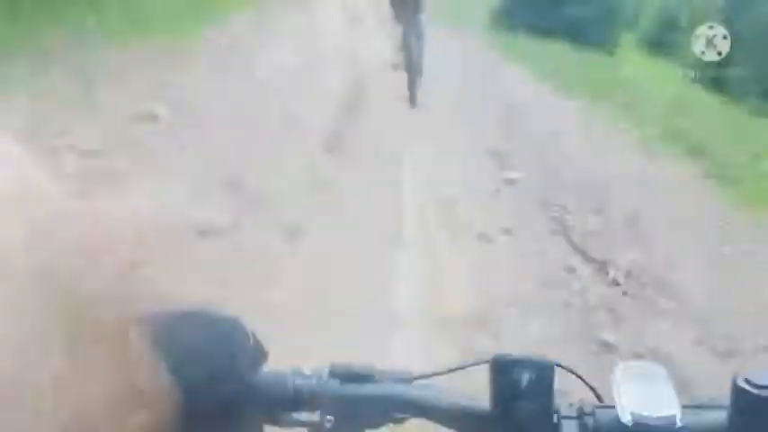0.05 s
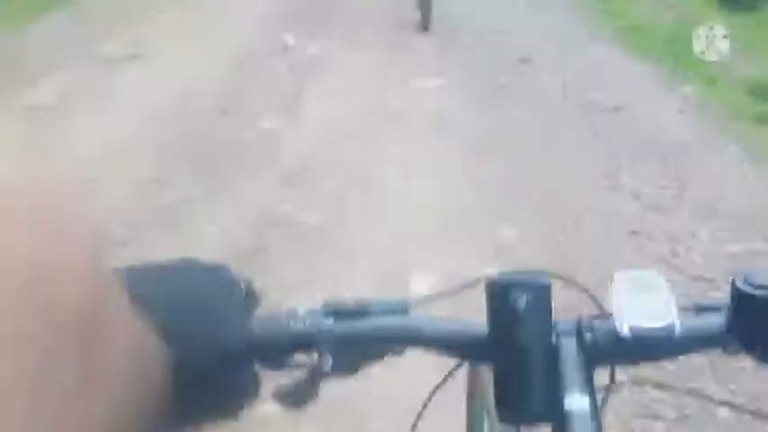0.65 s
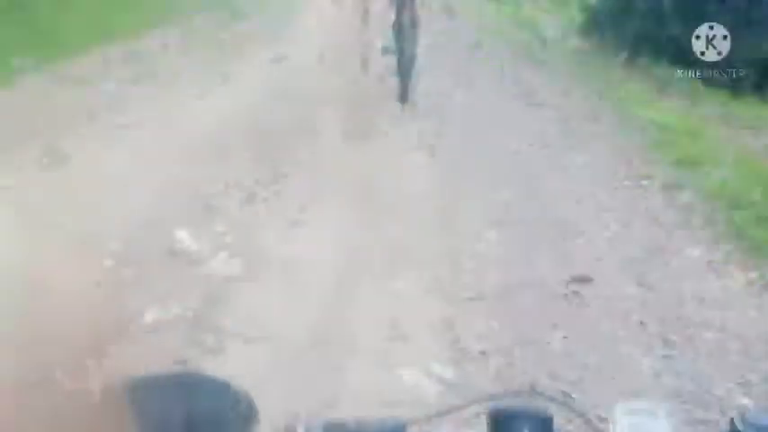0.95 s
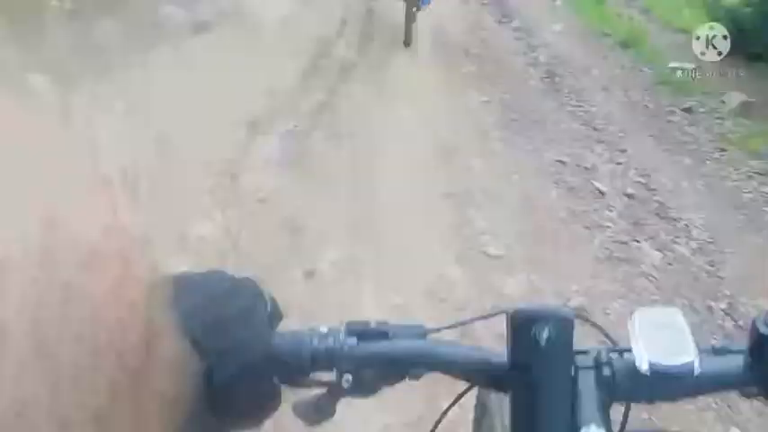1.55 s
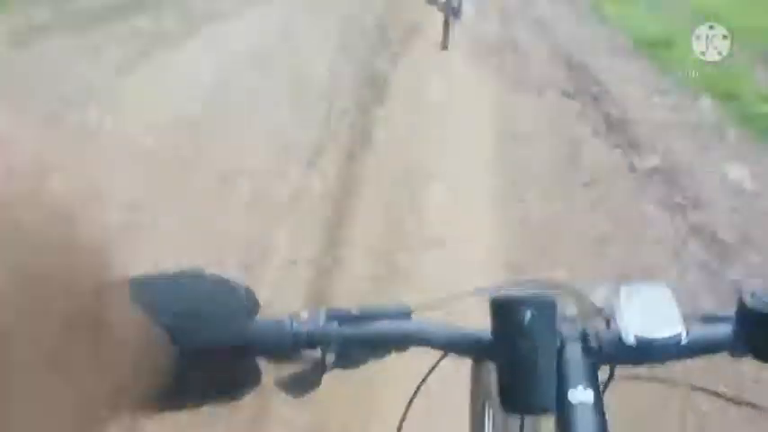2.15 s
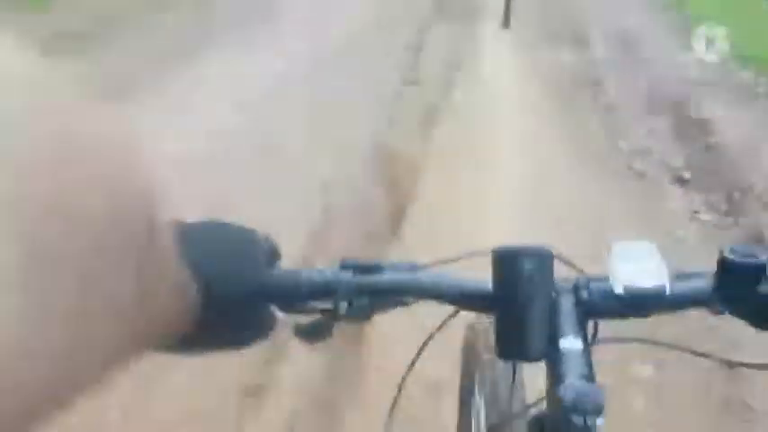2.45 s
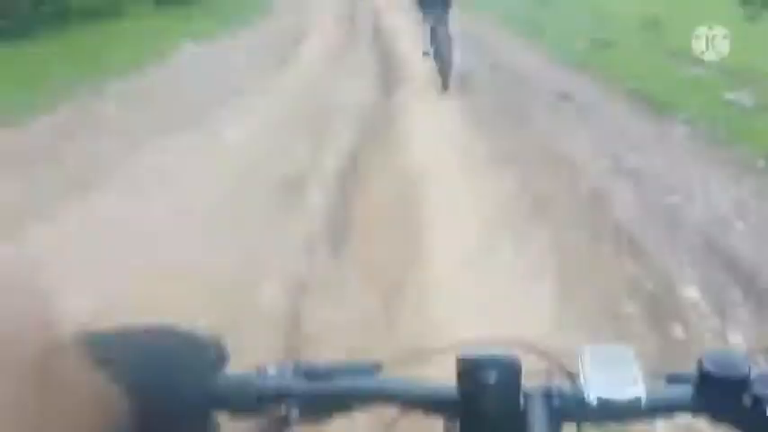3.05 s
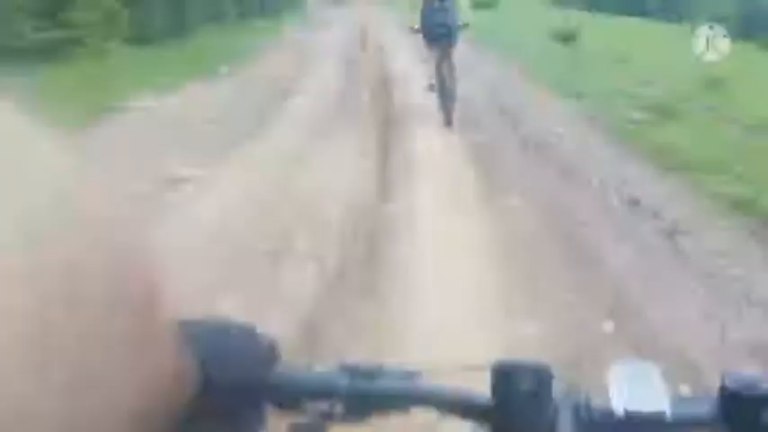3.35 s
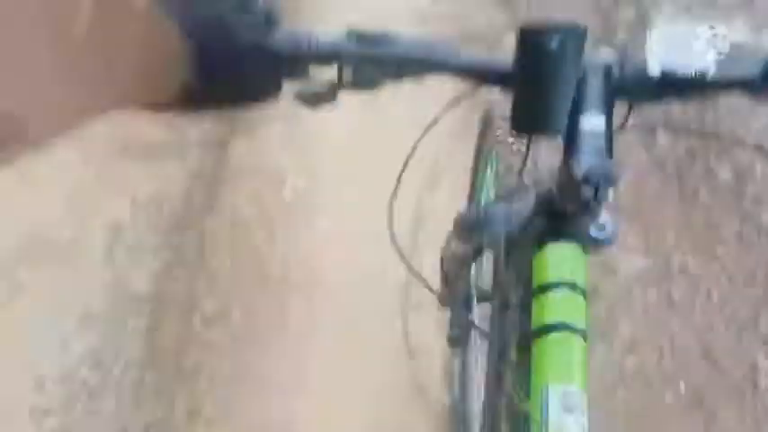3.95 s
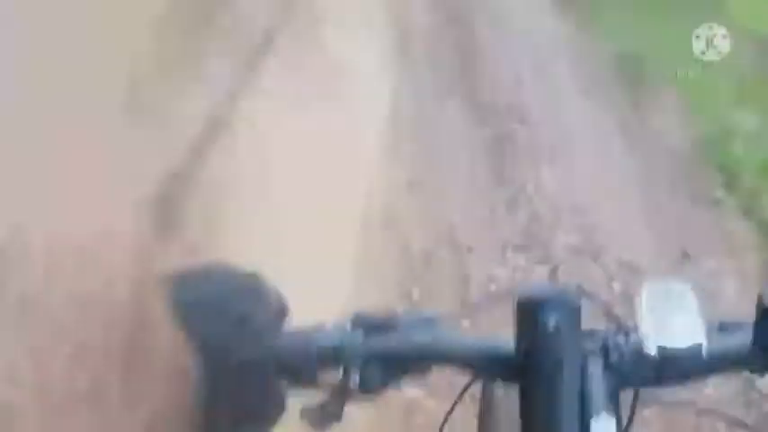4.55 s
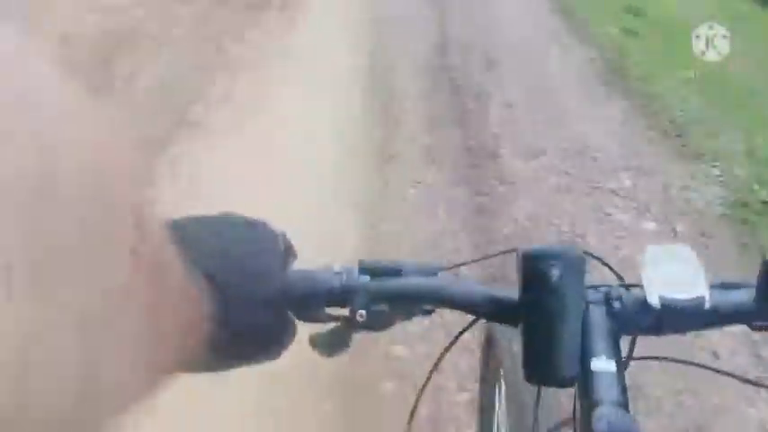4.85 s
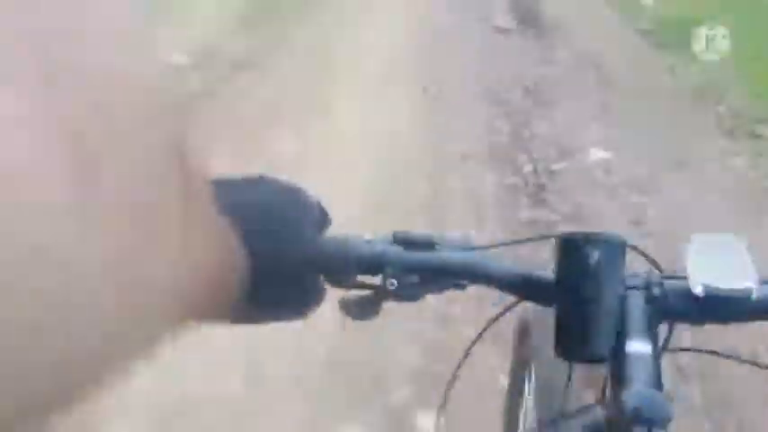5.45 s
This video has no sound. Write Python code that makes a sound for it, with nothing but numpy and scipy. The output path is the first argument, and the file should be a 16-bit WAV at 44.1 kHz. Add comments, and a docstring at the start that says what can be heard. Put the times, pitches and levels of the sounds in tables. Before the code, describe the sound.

A mountain bike runs fast along a gravel track, heard from a microphone on the rider's chest. Wind rumbles throughout as the tyres crunch grit and knock small stones. Early on, the brakes give a string of rough, wavering squeals. Stronger gusts then buffet and hiss, while bumps bring dull thuds and sharp pops. Two shorter squeals follow, and the wind and crunching carry on.

```python
"""A gust and a crunch of gravel: a mountain bike runs fast down a track, heard from the rider's chest.
Stick-slip friction makes the brakes squeal roughly with each squeeze of the lever. The tyres snap
grit and fling stones, each impact a short pulse. Turbulence buffets the two microphone ports and
hisses across the left one; hard bumps jolt the mount and bring sharp pops at the ports."""
import sys
import numpy as np
from scipy import signal
from scipy.io import wavfile
from scipy.ndimage import uniform_filter1d

SR = 44100
rng = np.random.default_rng(int(sys.argv[2]) if len(sys.argv) > 2 else 0)


def bounce(signal):
    """Save signal as a 16-bit WAV file at the path given by the first command-line argument."""
    frames = np.transpose(np.atleast_2d(signal))
    limited = np.clip(frames, -1, 1)
    pcm = np.round(limited * 32767).astype(np.int16)
    wavfile.write(sys.argv[1], SR, pcm)


N = 250929
TIME = np.arange(N) / SR

# lever squeezes: t/s of full grip, hold/s, 20 dB rise/s, 20 dB fall/s, level/dB, overtones/dB, f/Hz
SQUEEZES = [(.74, .06, 0.04682, .25, -23.5, -9, 828), (0.996, 0.19877, 0.3812, 0.3817, -19, 1, 828.5),
            (1.25, 0.23742, 0.0953, 0.0757, -20.5, 0, 844.8),
            (1.573, 0.06753, 0.2238, 0.1412, -21, -0.5, 837.1),
            (1.678, 0.029956, 0.0404, 0.0401, -18, 4, 845.9),
            (1.798, 0.07872, 0.2575, 0.1701, -21.5, 1.5, 834.2),
            (2.146, 0.08213, 0.179, 0.1765, -20, 0, 828.2),
            (3.151, 0.03213, 0.0216, 0.0625, -19.5, 4, 840.5), (3.175, .045, .16, .21, -18, -12.5, 822),
            (4.362, 0.02202, 0.2207, 0.1617, -29.5, -12.5, 823),
            (4.414, 0.01075, 0.0684, 0.1332, -22, 0.5, 853.3),
            (4.459, 0.078126, 0.0969, 0.3409, -19.5, -0.5, 839.4),
            (4.83, 0.03455, 0.0023, 0.2456, -32, 1.5, 836.8)]
# squeal at a firm grip: harmonic number, left level/dB, right level/dB, port likeness, echo share
SQUEAL_PARTIALS = [(1, -18.5, -25, 0.21, 0.54), (2, -20.5, -25, 0.8, 0.64), (3, -37, -50, 0, .55),
                   (4, -38.5, -59, .82, 0.58)]
FIRM_GRIP_DB, CATCH_DB = -20, -16   # the squeal dies away below CATCH_DB re a firm grip
SAG_HZ_PER_S, SAG_LIMIT_HZ = 110, 12   # the pitch sinks through each squeeze
OVERTONE_GROWTH = 1.5942   # dB per dB of grip


def brakes(waver=0.0095, rasp=0.0088906, chatter_db=1.5, doppler_hz=55, far_port_hz=45):
    """Stick-slip oscillation: pads on the rotor sound a harmonic series, brighter under a firmer grip."""
    grips, overtones, pitches = [], [], []
    for s, hold_s, rise_s, fall_s, db, overtones_db, hz in SQUEEZES:
        grip = from_db(db - FIRM_GRIP_DB) * swell(s, hold_s, rise_s, fall_s)
        grips.append(grip)
        overtones.append(from_db(overtones_db) * grip ** OVERTONE_GROWTH)
        pitches.append(hz - np.clip(SAG_HZ_PER_S * (TIME - s - hold_s / 2), -SAG_LIMIT_HZ, SAG_LIMIT_HZ))
    pitch = np.average(pitches, axis=0, weights=np.square(grips))
    pitch *= 1 + waver * drift(27.511) + rasp * drift(156.02)
    phase = 2 * np.pi * np.cumsum(pitch) / SR
    caught = np.clip(np.max(grips, axis=0) / from_db(CATCH_DB), 0, 1) ** 4
    chatter = from_db(chatter_db * drift(24))
    out = np.zeros((2, N))
    for harmonic, left_db, right_db, likeness, share in SQUEAL_PARTIALS:
        strength = caught * chatter * np.max(overtones if harmonic > 1 else grips, axis=0)
        tone = np.sqrt(2) * strength * np.exp(1j * harmonic * phase)
        tone *= echoes(share, doppler_hz * harmonic ** 0.63)
        far_tone = tone * echoes(np.sqrt(1 - likeness ** 2), far_port_hz)
        out[0] += from_db(left_db) * tone.real
        out[1] += from_db(right_db) * far_tone.real
    return out


def echoes(share, spread_hz):
    """Interference: a tone beats with its Doppler-shifted echoes off the passing ground; a complex gain."""
    smear = signal.sosfilt(signal.butter(3, spread_hz, fs=SR, output="sos"), turbulence())
    smear = rms_one(smear) / np.sqrt(2)
    return np.sqrt(1 - share ** 2) + share * (smear[0] + 1j * smear[1])


# pads touching too lightly to squeal: t/s, hold/s, level/dB
LIGHT_TOUCHES = [(0.404, 0.2837, -39.5), (4.747, .08, -35), (4.99, 0.4627, -36.5)]


def drag(grit_db=2.0, hum_db=-5, right_db=-3.5):
    """Sliding friction: pads rub the rotor into gritty noise, with a faint ring at the squeal's pitch."""
    pressure = sum(from_db(db) * swell(s, hold_s, attack_s=0.06767, release_s=0.16)
                   for s, hold_s, db in LIGHT_TOUCHES)
    slips = grains(per_s=3000, spread_db=2.5)
    rub = rms_one(band(slips[0], 1346.8, 1862.4))
    hum = from_db(hum_db) * rms_one(band(slips[1], 805, 870))
    return pressure * (rub + hum) * from_db(grit_db * drift(30)) * from_db([[0], [right_db]])


# tyres rolling on coarser and finer gravel, and sliding under braking: t/s, level/dB
CRUNCH_LEVEL = [(0.0, -20), (.1, -38), (.26, -40), (.54, -25.5), (.8, -31.5), (1.4, -30.5), (1.6, -34),
                (2.26, -34.5), (2.45, -44), (2.95, -45.5), (3.15, -34), (3.53, -46.5), (3.76, -35.5),
                (4.0, -48), (4.5, -34), (4.75, -44), (5.2, -32.5), (5.69, -36)]
SKID_LEVEL = [(.25, -47.5), (.46, -58), (.53, -35.5), (.65, -40.5), (.76, -52), (1.0, -40), (1.4, -43.5),
              (1.6, -42), (2.2, -54), (2.4, -65)]
# their spectra: f/Hz, relative level/dB
CRUNCH_SPECTRUM = [(300, 3.5), (520, -2.5), (850, 4.5), (1300, 13), (1750, -2), (2200, -3.5), (3200, -4),
                   (4200, -23.5), (6500, -69), (10000, -43), (15500, -71)]
SKID_SPECTRUM = [(1100, -1), (1700, -6.5), (2300, 20), (2900, 23), (3400, -39), (4000, -34), (6000, -31.5)]
# right port re left: f/Hz, level/dB
TYRE_BALANCE = [(300, 1.5), (700, -16.5), (1200, -8), (1750, -1), (2400, -33), (3200, -10), (5500, 13.5),
                (10000, 14.5)]
# likeness of the ports: f/Hz, correlation
TYRE_COHERENCE = [(300, 0.7875), (900, 0.057), (1600, 0.762), (3300, 0.64), (5000, .3), (12000, .1)]


def gravel():
    """Shot noise: grit snaps under the tread in clumps over finer sand; a sliding tyre scrapes brighter."""
    def grit_and_sand():
        return grains(per_s=1100, spread_db=5.5) + 1.1692 * grains(per_s=7000, spread_db=3.0)

    crunch_db, = in_time(CRUNCH_LEVEL)
    skid_db, = in_time(SKID_LEVEL)
    clumps = drift(58)
    crunch = at_ports(grit_and_sand, CRUNCH_SPECTRUM, TYRE_BALANCE, TYRE_COHERENCE, flicker_db=4.5)
    scrape = at_ports(lambda: grains(per_s=3300, spread_db=7.0),
                      SKID_SPECTRUM, TYRE_BALANCE, TYRE_COHERENCE, flicker_db=2.5)
    return crunch * from_db(crunch_db + 0.7114 * clumps) + scrape * from_db(skid_db + 3.0 * clumps)


# larger stones knocked by the tyres: t/s, level/dB, f/Hz
STONE_IMPACTS = [(.006, -5.5, 1129), (.285, -17.5, 1804), (.397, -10.5, 1291), (.4333, -11, 1616),
                 (.4878, -6.5, 1406), (.4989, -3, 1665), (.503, -3.5, 1450), (.527, -9.5, 1925),
                 (.5513, -0.5, 1037), (.5966, -8, 1361), (.617, -9, 1658), (1.18, -7, 1512),
                 (1.233, -3, 1598), (1.296, -4.5, 1430), (1.35, -1.5, 1280), (2.3495, -20.5, 983),
                 (2.4283, -17.5, 1263), (2.8736, -4, 1160), (3.4267, -16, 1112), (3.6351, -11.5, 1240),
                 (4.027, -11, 1373), (4.266, -17.5, 1294), (4.996, -15.5, 1550), (5.2181, -14.5, 1431),
                 (5.247, -11.5, 1121), (5.482, -12, 1599), (5.5919, -8.5, 1510)]


def stones(ring_s=0.0008388, tick_hz=3100, tick_s=0.0007305, scuff_s=0.0086):
    """Damped free vibration: a struck stone knocks for a few cycles, with a tick and a scuff of grit."""
    out = np.zeros(N)
    grit = rms_one(band(rng.standard_normal(N), 1700, 2300))
    for s, db, hz in list(STONE_IMPACTS) + pebbles():
        near = slice(int(s * SR), int(s * SR) + SR // 20)
        age = TIME[near] - TIME[near][0]
        knock = np.sin(2 * np.pi * hz * age) * np.exp(-age / ring_s)
        tick = 0.4595 * np.sin(2 * np.pi * tick_hz * age) * np.exp(-age / tick_s)
        scuff = 0.052 * grit[near] * np.exp(-age / scuff_s)
        out[near] += from_db(db) * (knock + tick + scuff)
    return band(out, 550, 2100) * from_db([[3], [-2]])


def pebbles(count=16, over_crunch_db=9.5, spread_db=0.5, ring_hz=1736.4, spread_octaves=0.9):
    """Random impacts: small stones fly, louder on coarser gravel; rows of t/s, level/dB, f/Hz."""
    crunch_db, = in_time(CRUNCH_LEVEL)
    moments = rng.integers(0, N, count)
    return [(TIME[i], crunch_db[i] + over_crunch_db - spread_db * softness,
             ring_hz * 2 ** (spread_octaves * pitch))
            for i, (softness, pitch) in zip(moments, rng.standard_normal((count, 2)))]


# jolts from bumps: t/s, level/dB, f/Hz
MOUNT_JOLTS = [(.588, -13, 68.87), (1.716, -5.5, 71.05), (1.732, -13.5, 152.8), (1.921, -13, 43.92),
               (2.852, -7.5, 59.4), (2.873, -11.5, 115.6), (3.031, -15, 74.26), (3.405, -11.5, 115.5),
               (3.605, -11, 56.2), (3.741, -7.5, 129.4), (3.975, -8, 102.9), (4.025, -9, 117.1),
               (5.302, -9, 105.2), (5.38, -7, 140.2), (5.411, -11, 48.3), (5.549, -10.5, 68.65)]
# sharp pops at the microphone ports on hard bumps: t/s, level/dB
PORT_POPS = [(1.7175, -7.5), (1.727, -10), (2.87, -9), (2.874, -6), (3.3959, -5), (3.405, -7.5),
             (4.0255, -10), (4.647, -19.5), (5.219, -14), (5.3791, -28.5)]


def bumps(jolt_cycles=0.5298, pop_s=0.00183, roughness=0.0443, edge=0.2333):
    """Shock excitation: a bump shakes the mount for a cycle or two; sharp pulses pop at the ports."""
    thuds = sum(from_db(db) * np.exp(-((TIME - s) * hz / jolt_cycles) ** 2)
                * np.cos(2 * np.pi * hz * (TIME - s)) for s, db, hz in MOUNT_JOLTS)
    clicks = np.zeros(N)
    for s, db in PORT_POPS:
        clicks[int(s * SR)] = from_db(db)
    pulses = signal.lfilter([1], [1, -np.exp(-1 / (pop_s * SR))], clicks + 1e-18)
    pops = band(pulses * (1 + roughness * turbulence()) + edge * clicks, 420, 8000, order=1)
    return thuds + pops * from_db([[2], [0]])


# rattle of the housing: f/Hz, relative level/dB
HOUSING_SPECTRUM = [(110, 1.5), (220, 4.5), (400, -5.5), (800, -12), (1600, -29), (3200, -40.5)]


def shudder(rattle_db=-13):
    """Structure-borne sound: the housing rattles dully for an instant around each pop."""
    gain = sum(from_db(db + rattle_db) * swell(s, 0, attack_s=0.009553, release_s=0.01605)
               for s, db in PORT_POPS)
    return gain * at_ports(turbulence, HOUSING_SPECTRUM, EDDY_BALANCE, WIND_COHERENCE, flicker_db=1.5)


# large eddies, small eddies, edge hiss and a steady rush of air: f/Hz, relative level/dB
BUFFET_SPECTRUM = [(12, 6.5), (25, 4), (50, -4.5), (90, -6.5), (130, -19.5), (220, -43), (400, -42)]
FLUTTER_SPECTRUM = [(60, -18), (130, 0.5), (200, -1.5), (300, -5.5), (450, -22.5), (700, -11), (1400, -19),
                    (3000, -37)]
HISS_SPECTRUM = [(300, 10), (600, 2.5), (1200, 8), (1900, -0.5), (3500, 7), (5000, 0), (7000, -11.5),
                 (10000, -25.5), (15500, -23.5)]
AIR_SPECTRUM = [(30, 8), (150, 8), (400, -1), (1500, -3), (2400, -34), (4500, -10.5), (8000, -30),
                (15500, -54.5)]
# right port re left: f/Hz, level/dB
EDDY_BALANCE = [(30, 0.5), (300, 0), (1000, -1.5), (3000, -19)]
HISS_BALANCE = [(500, -1.5), (1600, -7), (3000, -12.5), (5500, -27), (8000, 12), (11000, -20),
                (15000, -13.5)]
# likeness of the ports: f/Hz, correlation
WIND_COHERENCE = [(40, 1), (130, 0.9339), (260, 0.12), (700, 0.5056), (2000, 0.091), (6000, 0.041),
                  (12000, .05)]
FLUTTER_DB, BUFFET_REFERENCE_DB, HISS_REFERENCE_DB = -31, -22.5, -38.5


def wind(air_db=-46.0, eddy_db=1.5, sputter_db=1.0):
    """Turbulent pressure: large eddies buffet, small ones flutter, fast air sputters at the left port."""
    hiss_gain, buffet_gain = airflow()
    # the flutter follows a share of the other two's swings about their reference levels
    flutter_gain = from_db(FLUTTER_DB) * (buffet_gain / from_db(BUFFET_REFERENCE_DB)) ** 0.53085
    flutter_gain *= (hiss_gain / from_db(HISS_REFERENCE_DB)) ** 0.12046
    swirl_db = eddy_db * drift(46)
    buffet = at_ports(turbulence, BUFFET_SPECTRUM, EDDY_BALANCE, WIND_COHERENCE, flicker_db=1.5)
    buffet /= np.sqrt(uniform_filter1d(buffet[0] ** 2, size=5000) + 0.14)   # eddies of even strength
    flutter = at_ports(turbulence, FLUTTER_SPECTRUM, EDDY_BALANCE, WIND_COHERENCE, flicker_db=3.0)
    # dust in the airstream ticks against the housing
    hiss = at_ports(lambda: turbulence() + 0.4401 * grains(per_s=90, spread_db=3.0),
                    HISS_SPECTRUM, HISS_BALANCE, WIND_COHERENCE, flicker_db=3.0)
    air = at_ports(turbulence, AIR_SPECTRUM, HISS_BALANCE, WIND_COHERENCE, flicker_db=3.5)
    return (buffet * buffet_gain
            + flutter * flutter_gain * from_db(swirl_db)
            + hiss * hiss_gain * from_db(.5 * swirl_db + sputter_db * drift(200))
            + air * from_db(air_db))


# headwind between the gusts: t/s, hiss level/dB, buffet level/dB
HEADWIND_LEVELS = [(0, -37, -27.5), (1.0, -59, -28), (1.5, -54.5, -27.5), (2.1, -51.5, -32.5),
                   (2.6, -49, -29), (3.45, -48, -39.5), (4.7, -42.5, -27.5), (5.0, -49.5, -31.5),
                   (5.69, -40, -25)]
# gusts that hit the ports as the rider bobs: t/s, hold/s, hiss level/dB, buffet level/dB
PORT_GUSTS = [(0.0, 0.06041, -30, -17), (.115, .05, -31, -20), (.19, .04, -34, -25),
              (0.324, 0.02222, -43.5, -21.5), (0.462, 0.0207, -41.5, -21.5), (0.581, 0.03832, -41.5, -20.5),
              (0.665, 0.01728, -39, -24), (0.763, 0.02554, -39, -24.5), (0.837, 0.02927, -46, -22),
              (1.656, 0.05577, -31, -18.5), (1.803, 0.04762, -36.5, -29.5), (1.905, 0.03787, -42.5, -23),
              (2.156, 0.0422, -39.5, -27.5), (2.397, 0.01845, -35.5, -36), (2.797, 0.01661, -27, -17.5),
              (2.85, 0.02194, -29, -14), (2.998, 0.0417, -25.5, -19), (3.08, 0.03804, -31, -26),
              (3.24, 0.02446, -31.5, -20.5), (3.371, 0.02281, -29, -16), (3.534, 0.02644, -28, -25.5),
              (3.603, 0.0521, -31, -23.5), (3.712, 0.049265, -24.5, -13), (3.797, 0.05489, -30.5, -26),
              (3.945, 0.03768, -25.5, -13.5), (4.011, 0.02163, -28.5, -15), (4.075, 0.019954, -30, -23.5),
              (4.19, 0.04716, -26.5, -20), (4.269, 0.048, -30, -24.5), (4.396, 0.06366, -29, -18),
              (4.502, 0.01817, -30, -21.5), (4.63, 0.016, -33, -29.5), (4.719, 0.014216, -38, -24),
              (4.784, 0.01483, -39.5, -26), (5.074, 0.04232, -31, -20.5), (5.198, 0.02998, -31.5, -17),
              (5.284, 0.1137, -29.5, -17), (5.439, 0.02416, -36, -22.5), (5.555, 0.03453, -41.5, -18),
              (5.675, 0.02006, -34.5, -21.5)]


def airflow(eddy_lag_s=0.00702):
    """Unsteady flow: the headwind, or the strongest gust above it, sets the gains of hiss and buffet."""
    hiss, buffet = from_db(in_time(HEADWIND_LEVELS))
    for s, hold_s, hiss_db, buffet_db in PORT_GUSTS:
        fast_air = swell(s, hold_s, attack_s=0.036005, release_s=0.0676)
        large_eddies = swell(s + eddy_lag_s, hold_s, attack_s=0.03461, release_s=0.04653)
        hiss = np.maximum(hiss, from_db(hiss_db) * fast_air)
        buffet = np.maximum(buffet, from_db(buffet_db) * large_eddies)
    return hiss, buffet


def at_ports(excitation, spectrum, balance, coherence, flicker_db):
    """Partial coherence: the ports share part of each flickering half-octave band; rms 1."""
    bottom_hz, top_hz = spectrum[0][0], spectrum[-1][0]
    edges = np.geomspace(bottom_hz, top_hz, 1 + round(2 * np.log2(top_hz / bottom_hz)))
    out, sources = np.zeros((2, N)), [excitation(), excitation()]
    for k, (low, high) in enumerate(zip(edges, edges[1:])):
        shared, own = band(sources[k % 2], low, high)
        hz = np.sqrt(low * high)
        alike = np.clip(at_hz(coherence, hz), 0, 1)
        gain = from_db(at_hz(spectrum, hz) + flicker_db * drift(18.092))
        out[0] += gain * shared
        out[1] += gain * from_db(at_hz(balance, hz)) * (alike * shared + np.sqrt(1 - alike ** 2) * own)
    return rms_one(out)


def turbulence():
    """White noise in two uncorrelated channels."""
    return rng.standard_normal((2, N))


def grains(per_s, spread_db):
    """Poisson process: two trains of random clicks, many small and a few large."""
    sizes = from_db(spread_db * np.minimum(rng.exponential(1, (2, N)), 4)) * rng.choice([-1, 1], (2, N))
    return rms_one(sizes * (rng.random((2, N)) < per_s / SR))


def drift(corner_hz, step=40, settle=2000):
    """Random modulation: low-passed noise of rms 1, computed once every `step` samples."""
    pole = np.exp(-2 * np.pi * corner_hz * step / SR)
    noise = rng.standard_normal(N // step + settle + 2)
    slow = signal.lfilter([1], [1, -2 * pole, pole * pole], noise)[settle:]
    return np.interp(np.arange(N) / step, np.arange(len(slow)), rms_one(slow))


def swell(start_s, hold_s, attack_s, release_s):
    """Exponential rise and decay around a hold; each flank covers 20 dB in its time."""
    outside = np.maximum((start_s - TIME) / attack_s, (TIME - start_s - hold_s) / release_s)
    return from_db(-20 * np.clip(outside, 0, 10))


def band(x, low_hz, high_hz, order=2):
    """Butterworth band-pass."""
    return signal.sosfilt(signal.butter(order, [low_hz, high_hz], "band", fs=SR, output="sos"), x + 1e-18)


def in_time(rows):
    """Linear interpolation of each column at every sample."""
    s, *columns = np.transpose(rows)
    return [np.interp(TIME, s, column) for column in columns]


def at_hz(points, hz):
    """Interpolation on a log-frequency axis."""
    frequencies, values = np.transpose(points)
    return np.interp(np.log(hz), np.log(frequencies), values)


def from_db(db):
    """Level to amplitude ratio."""
    return 10 ** (np.asarray(db) / 20)


def rms_one(x):
    """Normalisation to unit power."""
    return x / np.sqrt(np.mean(x ** 2) + 1e-20)


def scene(port_lag_s=26 / SR):
    """Superposition: all sources add at the two ports, reaching the right one slightly later."""
    left, right = wind() + gravel() + brakes() + drag() + stones() + bumps() + shudder()
    return np.array([left, np.interp(TIME - port_lag_s, TIME, right)])


def record(dry, cutoff_hz=15500):
    """Clipping and band limiting: peaks stop at full scale and the top treble is cut."""
    return signal.sosfilt(signal.ellip(10, .1, 90, cutoff_hz, fs=SR, output="sos"), np.clip(dry, -1, 1))


dry = scene()
out = record(dry)
bounce(out)
```